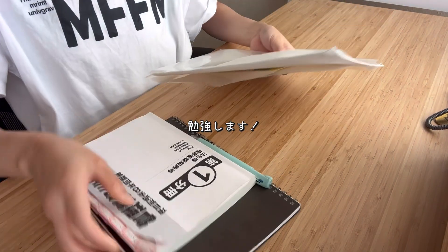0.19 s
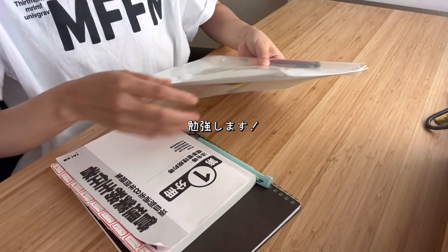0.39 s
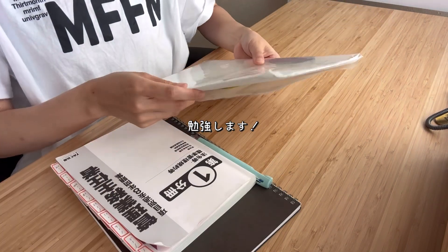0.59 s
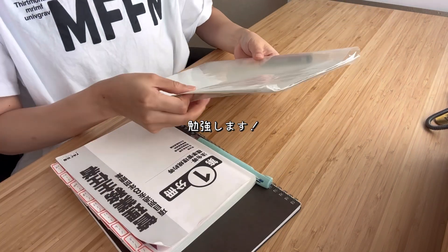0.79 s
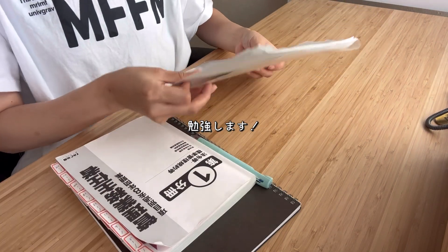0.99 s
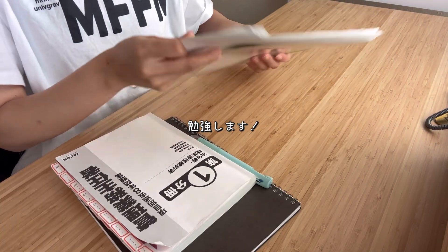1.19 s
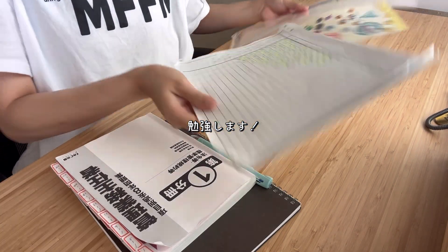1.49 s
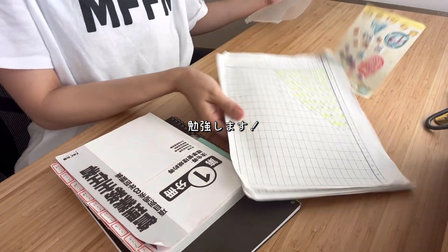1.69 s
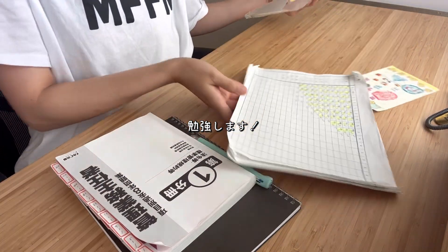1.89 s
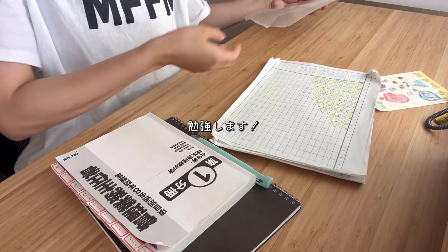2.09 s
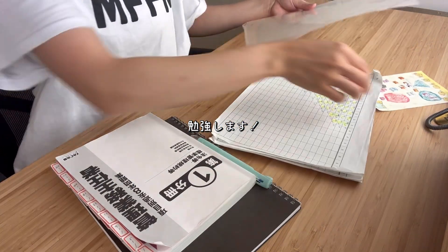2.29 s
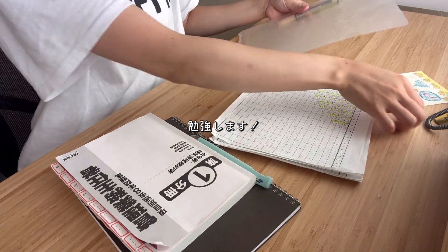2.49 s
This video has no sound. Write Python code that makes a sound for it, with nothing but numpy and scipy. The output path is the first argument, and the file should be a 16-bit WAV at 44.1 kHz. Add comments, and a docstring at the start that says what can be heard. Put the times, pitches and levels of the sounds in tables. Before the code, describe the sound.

A book lands on a wooden desk with one loud, woody knock after a brief rub; then soft paper rustling as a pad slides from its sleeve and is laid down, close stereo microphones, quiet room.

```python
"""Over quiet room tone, covers rub, a low rumble and a soft bump open the scene at a wooden desk.
Edges tick, a sheet hisses, and a book drops shut: clap, thud, rattle (noise) and desk ring (decaying sines).
A paper pad is then drawn from its sleeve: shaped noise slides, rubs, ticks and scrapes between bumps.
The pad is laid down with a last soft bump. A close microphone pair hears it all with faint wall echoes."""
import sys
import numpy as np
from scipy import signal
from scipy.fft import rfft, irfft
from scipy.io import wavfile
from scipy.ndimage import map_coordinates

SR = 44100
rng = np.random.default_rng(int(sys.argv[2]) if len(sys.argv) > 2 else 0)


def log_audio(samples):
    """Write samples as a 16-bit WAV file to the path given in sys.argv[1]."""
    # one column per channel
    frames = np.atleast_2d(samples).T
    # limit to full scale, then quantise
    limited = np.clip(frames, -1, 1)
    pcm = np.round(limited * 32767).astype(np.int16)
    wavfile.write(sys.argv[1], SR, pcm)


N = 114660
LOOP_N = 32768  # samples before looped noise repeats
T = np.arange(N) / SR
# frequency axes [Hz], offset by 1 Hz to keep logarithms finite
F = np.fft.rfftfreq(2 * N, 1 / SR) + 1
LOOP_F = np.fft.rfftfreq(LOOP_N, 1 / SR) + 1

# microphone pair: (frequency [Hz], share of scattered sound [0-1],
# left minus right level [dB], left phase lead [rad])
PAIR = [(100, 0.01, -4, 1), (300, 0.1, -5.5, 0.9), (986, 0.3, -4, 1.17), (2200, 0.6, -1, 1),
        (4040, 0.8, -2.5, 1.5), (7500, 0.62, 5.5, 2.5), (10380, 0, -0.5, 1.64), (13800, 0, 0.5, 0),
        (17000, 0.63, -1, -5.5)]


def amp(db):
    """Decibels to gain."""
    return 10 ** (np.asarray(db) / 20)


def unit(x):
    """Scale to rms 1."""
    return x / np.sqrt(np.mean(x ** 2))


def over_hz(table, axis=1, f=F):
    """One column of a table, joined on a log-frequency axis."""
    table = np.array(table)
    return np.interp(np.log(f), np.log(table[:, 0]), table[:, axis])


def shaped(x, gain):
    """Filter by a gain per frequency."""
    return irfft(rfft(x, 2 * N) * gain)[..., :N]


def fade(start_s, t60_s):
    """Sudden start and exponential decay by 60 dB per t60."""
    return (T >= start_s) * np.exp(-np.log(1000) * np.maximum(T - start_s, 0) / t60_s)


def wander(rate_hz):
    """Random values joined by lines."""
    return np.interp(T * rate_hz, np.arange(N // 20), rng.standard_normal(N // 20))


def detuning(hz):
    """How far each loop frequency lies from a resonance."""
    return LOOP_F / hz - hz / LOOP_F


def hiss(gain, f=LOOP_F):
    """Noise of a given spectrum at rms 1, partly shared by the microphones; repeats to fill N."""
    share = np.clip(over_hz(PAIR, axis=1, f=f), 0, 1)
    z = rng.standard_normal((3, 2 * len(f))).view(complex)
    common = z[0] * np.sqrt(1 - share)
    scattered = z[1:] * np.sqrt(share)
    x = unit(irfft((common + scattered) * gain))
    return np.tile(x, N // x.shape[1] + 1)[:, :N]


def noise(colour, tilt_db=0, f=LOOP_F):
    """Coloured noise at both microphones, tilted per octave above 150 Hz."""
    return hiss(amp(over_hz(colour, f=f) + tilt_db * np.log2(np.maximum(f, 150))), f)


def friction(strokes, colour, rough_db, catch_hz):
    """Strokes swell, hold and die away, 20 dB per rise or fall time; fibres catch and slip."""
    out = 0
    for at_s, rise_s, hold_s, fall_s, db, tilt_db in strokes:
        before = np.maximum(at_s - T, 0) / max(rise_s, .003)
        after = np.maximum(T - at_s - hold_s, 0) / max(fall_s, .003)
        level_db = db - 20 * np.minimum(before + after, 10)
        out = out + amp(level_db) * noise(colour, tilt_db)
    roughness_db = rough_db * wander(catch_hz) + rough_db / 2 * wander(catch_hz / 6)
    return out * unit(amp(roughness_db))


def push(at_s, hz, cycles):
    """A short swing of pressure from a flat face meeting the desk."""
    turn = (T - at_s) * hz
    return -np.exp(-(turn / cycles) ** 2) * np.cos(2 * np.pi * turn)


def desk(at_s):
    """The desk top takes up a blow and rings in decaying modes."""
    # desk modes: (frequency [Hz], level [dB], t60 [s])
    modes = [(60.1, -8, 0.37), (110.3, -9.5, .22), (136.4, -4, 0.27), (202.5, -3, 0.24), (277.6, -6, 0.16),
             (384.7, -10.5, .2), (493, -15.5, .18), (530, -16.5, 0.11), (818, -24.5, .16), (850, -39, .18),
             (1034, -21, .16), (1103, -19, .14)]
    attack_s = 0.0012
    age_s = np.maximum(T - at_s, 0)
    ring = sum(amp(db) * fade(at_s, t60_s) * np.sin(2 * np.pi * hz * age_s) for hz, db, t60_s in modes)
    return (1 - np.exp(-(age_s / attack_s) ** 2)) * ring


def room_tone():
    """Steady noise, strongest in the bass."""
    # room spectrum: (frequency [Hz], density [dB per Hz])
    room_colour = [(25, -7), (45, -4.5), (65, 6.5), (95, 1), (140, -3), (200, 2), (300, -10.5),
                   (600, -19.5), (1200, -28.5), (3000, -37.5), (8000, -35), (15000, -49)]
    return amp(-60) * noise(room_colour, f=F)


def rubs():
    """Covers and fingers rub; friction also stirs the desk modes."""
    # rub strokes: (full speed [s], rise [s], hold [s], fall [s], level [dB], tilt [dB per octave])
    rub_strokes = [(0.002, 0.06, 0.202, 0.091, -49, 1), (0.468, 0.0081, 0.028, 0.11, -55.5, -6.5),
                   (0.685, 0.045, 0.031, 0.118, -52, 1.5), (0.795, 0.0085, 0.004, 0.087, -53, -3.5),
                   (0.89, 0.089, 0.042, 0.063, -52.5, 4), (0.955, 0.049, 0.0044, 0.062, -48.5, -5.5),
                   (1.04, 0.052, 0.009, .12, -47.5, -5), (1.16, 0.013, 0.0035, 0.26, -53.5, -3.5),
                   (1.235, 0.052, 0.07, 0.22, -51, -5), (1.48, 0.16, 0.094, 0.16, -52, -1),
                   (1.61, 0.092, 0.011, 0.1245, -49.5, -2), (1.742, 0.067, 0.02, 0.077, -39.5, -0.5),
                   (1.95, 0.25, 0.025, 0.17, -56.5, -0.5), (2.44, 0.027, 0.0084, 0.082, -44.5, -6.5),
                   (2.53, 0.11, 0.035, .1, -58.5, -3)]
    # rub spectrum: (frequency [Hz], density [dB per Hz])
    rub_colour = [(70, -6), (200, -8), (380, 0), (600, 0), (1050, -0.5), (1400, -4.5), (1800, -4.5),
                  (2800, -11), (5000, -18.5), (12000, -30.5)]
    desk_ring_db = -18.5
    rub = friction(rub_strokes, rub_colour, rough_db=3, catch_hz=180.2)
    ring = unit(desk(0)) / np.sqrt(N)  # unit energy
    return rub + amp(desk_ring_db) * shaped(rub, rfft(ring, 2 * N))


def drag_rumble():
    """One opening stroke of rough, low friction noise."""
    # stroke: (full speed [s], rise [s], hold [s], fall [s], level [dB], tilt [dB per octave])
    rumble_stroke = (0.004, .02, .2, .04, -50, 0)
    # rumble spectrum: (frequency [Hz], density [dB per Hz])
    rumble_colour = [(25, -26), (48, -9.5), (62, 3.5), (85, -12.5), (200, -18), (400, -21.5), (1500, -47)]
    return friction([rumble_stroke], rumble_colour, rough_db=8, catch_hz=30)


def bumps():
    """Hands and pad land softly and stir the desk."""
    # bumps: (time [s], push level [dB], push pitch [Hz], desk ring level [dB])
    landings = [(0.004, -42, 330, -45.5), (0.262, -24, 138, -39), (0.512, -43.5, 425, -52),
                (0.626, -48.5, 497, -52), (0.683, -47.5, 227, -44.5), (0.958, -39.5, 590, -64),
                (1.054, -41.5, 140, -51), (1.158, -41, 545, -57), (1.269, -44, 115, -69),
                (1.315, -46.5, 125, -56), (1.426, -46, 475, -56), (1.62, -53, 108, -66),
                (1.7482, -29, 302, -44), (2.4521, -36, 275, -50)]
    out = 0
    for at_s, db, hz, ring_db in landings:
        out = out + amp(db) * push(at_s, hz, cycles=1.0) + amp(ring_db) * desk(at_s)
    return out


def ticks():
    """Edges flick past each other: brief, broad noise bursts."""
    # ticks: (time [s], nominal peak [dB], centre [Hz], t60 [s])
    flicks = [(0.0635, -44, 7840, 0.013), (0.2267, -30, 3210, 0.0041), (0.465, -39, 3000, 0.052),
              (0.5155, -49, 7000, 0.024), (0.6238, -47.5, 1170, .04), (0.675, -31.5, 2870, 0.02),
              (0.7917, -40, 2740, 0.024), (0.7935, -43.5, 12000, .05), (1.019, -45.5, 5930, 0.024),
              (1.1547, -32, 1260, 0.028), (1.23, -39.5, 1390, 0.037), (1.364, -40, 2160, .02),
              (1.6035, -37, 1480, 0.088), (1.6562, -43, 2540, 0.011), (1.727, -34.5, 2870, 0.055),
              (1.764, -31.5, 1450, 0.073), (1.815, -34.5, 4427, 0.029), (2.068, -49.5, 1580, 0.067),
              (2.411, -56.5, 4960, 0.079), (2.4213, -49, 700, .07), (2.43, -45, 5500, 0.0093),
              (2.4386, -45.5, 3000, 0.024), (2.53, -47, 2000, 0.019)]
    out = 0
    for at_s, peak_db, hz, t60_s in flicks:
        burst = hiss(1 / (1 + (0.88 * detuning(hz)) ** 2))
        out = out + amp(peak_db) / 2 * fade(at_s, t60_s) * burst  # rms is half the peak
    return out


def crackle():
    """Gain that jumps and decays where a crease snaps."""
    snaps_per_s, rise_db, t60_s = 45, 2.5, 0.015  # rise limit re steady gain
    snaps = (rng.random(N) < snaps_per_s / SR) * rng.exponential(.5, N)
    rises = shaped(snaps, rfft(fade(0, t60_s), 2 * N))
    return 1 + amp(rise_db) * np.minimum(rises, 1)


def slides():
    """Sheets slide over sheets: bright friction noise with crackle."""
    # slide strokes: (full speed [s], rise [s], hold [s], fall [s], level [dB], tilt [dB per octave])
    slide_strokes = [(0.205, 0.15, 0.0042, 0.053, -51.5, 0.5), (0.465, 0.01, 0.0061, 0.11, -51.5, -4),
                     (0.55, 0.068, .005, 0.17, -63.5, -2.5), (0.632, 0.021, 0.044, 0.32, -58, -0.5),
                     (0.80, 0.091, 0.0049, 0.073, -51, -2), (0.90, 0.2, 0.16, 0.19, -57.5, -5),
                     (1.11, 0.041, 0.076, 0.2, -50.5, -2), (1.25, 0.18, 0.071, 0.44, -44, 2),
                     (1.5, 0.3, 0.042, .035, -46, -0.5), (1.66, 0.045, 0.013, 0.067, -50, 1),
                     (1.735, .02, 0.028, 0.21, -48, -4.5), (1.98, 0.19, .02, 0.12, -51, 0.5),
                     (2.09, 0.046, .05, 0.061, -67, -1), (2.415, 0.0083, 0.027, 0.32, -57.5, -5),
                     (2.56, 0.041, 0.009, 0.085, -59, -1)]
    # slide spectrum: (frequency [Hz], level [dB])
    slide_colour = [(500, -12), (1500, -3.5), (3200, -.5), (5000, 0), (8000, -2.3), (10500, -2.3),
                    (13000, -1.5), (15800, -1.4)]
    return friction(slide_strokes, slide_colour, rough_db=-0.5, catch_hz=498) * crackle()


def book():
    """The cover claps, the weight follows, pages shudder and the desk rings."""
    # landing: (time [s], clap level [dB], thud level [dB])
    knock = (0.2256, -11, -15)
    # shudder spectrum: (frequency [Hz], density [dB per Hz])
    rattle_colour = [(60, 1), (250, 2), (400, 1.5), (530, 7), (680, -6), (900, 5.5), (1300, -31),
                     (1900, -16), (2600, -30), (6000, -33), (15000, -54.5)]
    clap_lag_s, thud_lag_s = 0.00073, .0079
    crack_db, rattle_db, ring_db = -24.5, -27, -23
    at_s, clap_db, thud_db = knock
    clap = amp(clap_db) * push(at_s + clap_lag_s, hz=926, cycles=0.75)
    # stiff edge of the cover, within the clap
    crack = amp(crack_db) * push(at_s + clap_lag_s, hz=1823, cycles=1.4)
    thud = amp(thud_db) * push(at_s + thud_lag_s, hz=187.3, cycles=0.56)
    rattle = amp(rattle_db) * noise(rattle_colour) * fade(at_s, t60_s=0.14)
    return clap + crack + thud + rattle + amp(ring_db) * desk(at_s + thud_lag_s / 2)


def scrapes():
    """An edge scrapes: a band of friction noise climbs as the gap under it closes."""
    # scrapes: (loudest [s], half length [s], level [dB], centre [Hz], climb [octaves per s])
    strokes = [(1.725, .035, -49, 1150, 8), (1.975, .042, -53, 1900, 6)]
    width = 0.32  # share of the centre
    out = 0
    for at_s, half_s, db, hz, climb in strokes:
        band = hiss(1 / (1 + (detuning(hz) / width / 2) ** 2) ** 2)
        speed = 2 ** (climb * np.clip(T - at_s, -2 * half_s, 2 * half_s))
        place = np.cumsum(speed) % N  # reading faster raises the band
        swept = np.array([np.interp(place, np.arange(N), side) for side in band])
        out = out + amp(db) * swept * np.exp(-((T - at_s) / half_s) ** 2)
    return out


def flex(x):
    """A bending sheet's many small resonances come and go as shifting spectral peaks and dips."""
    depth_db, width_hz, lifetime_s = 3.2, 110, .05
    f, t, z = signal.stft(x, SR, nperseg=512)
    field = rng.standard_normal((int(f[-1] / width_hz) + 2, int(t[-1] / lifetime_s) + 2))
    grid = np.meshgrid(f / width_hz, t / lifetime_s, indexing="ij")
    gain = unit(amp(depth_db * map_coordinates(field, grid, order=2)))
    return signal.istft(z * gain, SR)[1][:, :N]


def pair():
    """Gain and phase of the two microphones per frequency."""
    sides = np.array([[.5], [-.5]])
    return amp(sides * over_hz(PAIR, axis=2)) * np.exp(1j * sides * over_hz(PAIR, axis=3))


def walls():
    """Response of the walls: decaying noise per side, duller than the direct sound."""
    level_db, top_hz = -15.5, 2000
    tail = unit(rng.standard_normal((2, N)) * fade(0.0074, t60_s=0.3)) / np.sqrt(N)
    return amp(level_db) * rfft(tail, 2 * N) / np.hypot(1, F / top_hz)


def scene():
    """All sounds reach the pair directly and from the walls."""
    paper = flex(rubs() + drag_rumble() + ticks() + slides() + scrapes())
    dry = room_tone() + bumps() + paper + book()
    return shaped(dry, pair() * (1 + walls()))


def record(dry):
    """The recorder cuts the deepest bass and the top."""
    top_hz = 15880
    high_pass = signal.butter(5, 40, "high", fs=SR, output="sos")
    thinned = signal.sosfilt(high_pass, dry)
    return shaped(thinned, F < top_hz)


dry = scene()
out = record(dry)
log_audio(out)
```